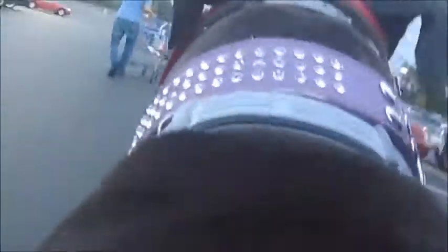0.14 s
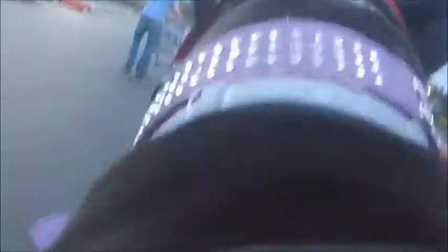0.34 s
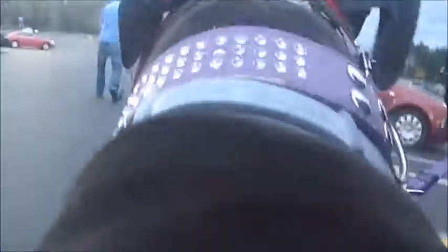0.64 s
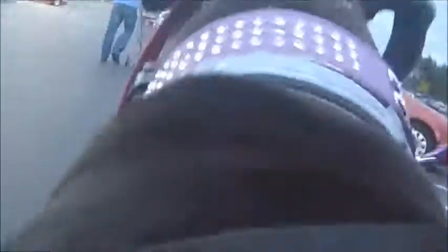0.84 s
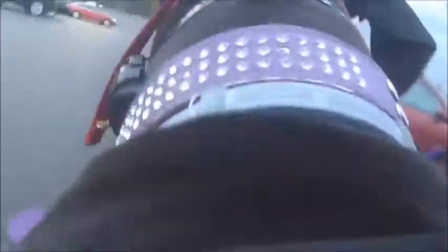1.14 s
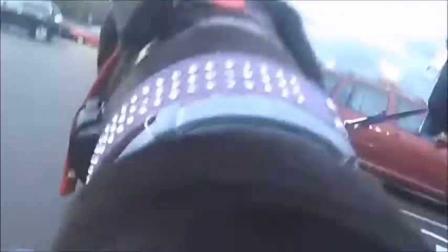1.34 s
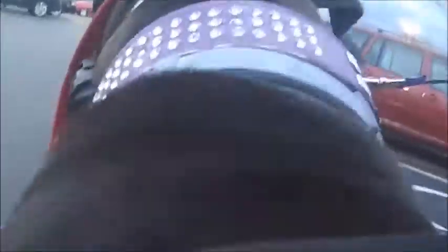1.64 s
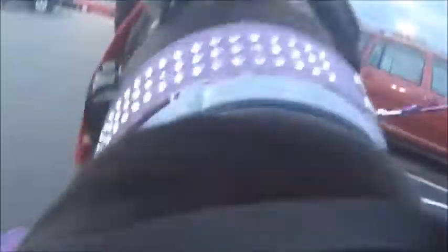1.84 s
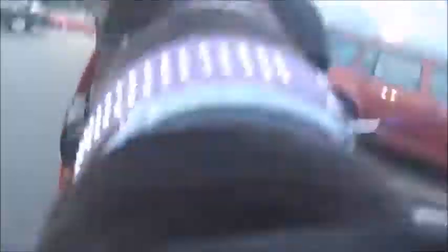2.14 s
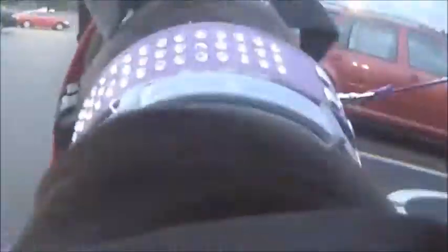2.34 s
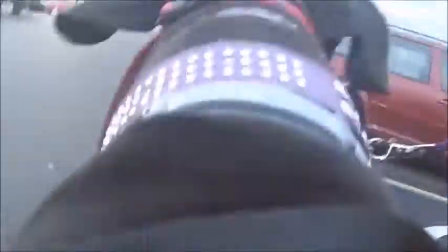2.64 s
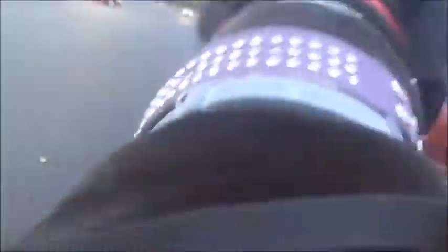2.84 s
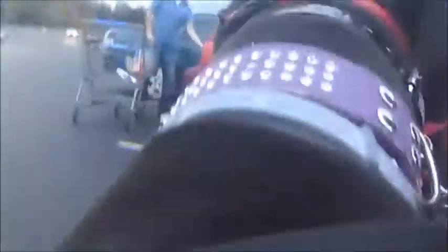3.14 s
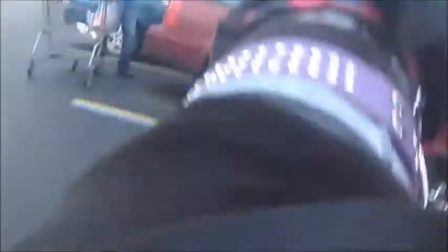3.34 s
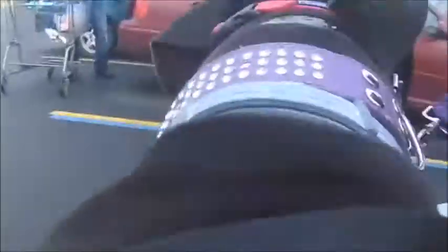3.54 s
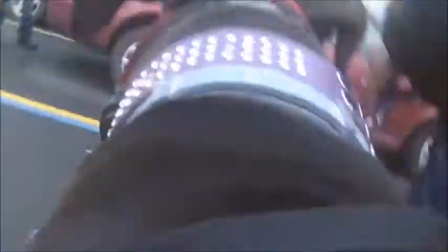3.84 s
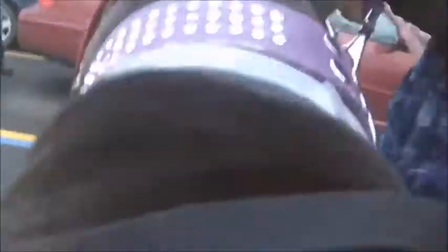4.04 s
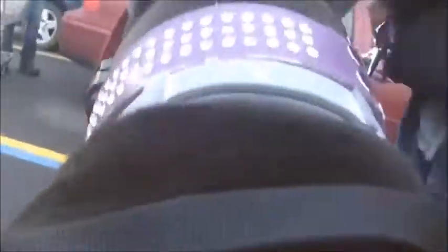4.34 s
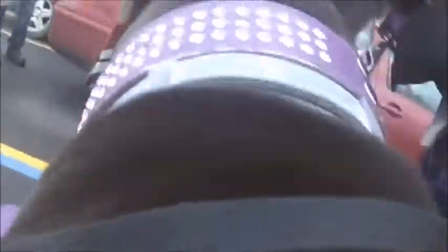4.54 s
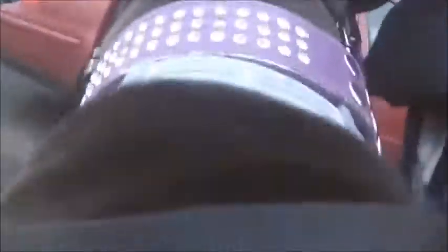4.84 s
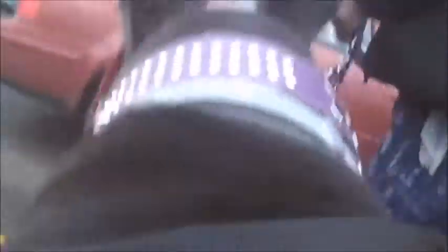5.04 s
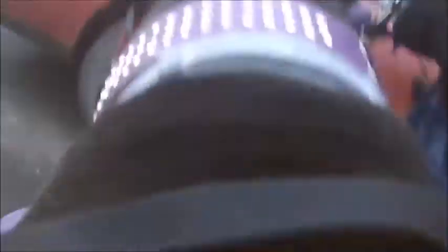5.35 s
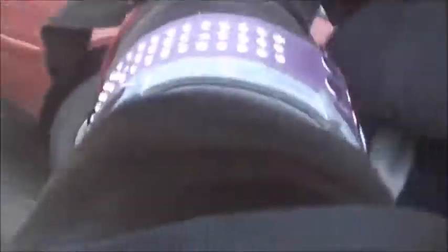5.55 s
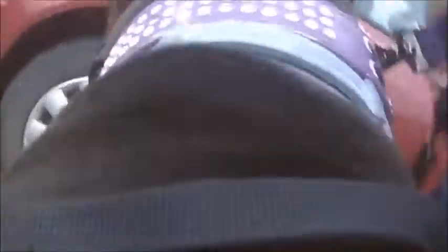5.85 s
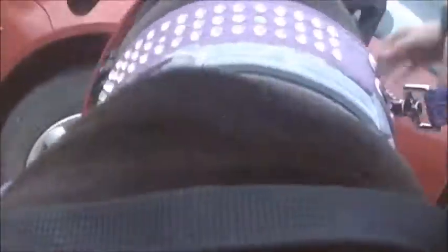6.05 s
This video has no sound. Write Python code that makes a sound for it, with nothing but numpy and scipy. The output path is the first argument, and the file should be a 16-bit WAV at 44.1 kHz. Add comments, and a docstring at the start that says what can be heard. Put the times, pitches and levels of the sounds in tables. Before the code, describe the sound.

Fur and harness rub scratchily against a microphone on a walking dog, with small ticks, two hard plastic knocks and faint outdoor hiss.

```python
"""A parking lot, heard from a small camera riding on the back of a walking dog.
Fur and harness rub on its plastic housing at every stride, the mount ticks and twice knocks hard,
and steps thud through the dog's body. A sharp clack near the end comes back from the parked cars.
Under it all lies a faint bed of outdoor rumble, hiss and hum."""
import sys
import numpy as np
from scipy import signal
from scipy.fft import rfft, irfft, next_fast_len
from scipy.io import wavfile
from scipy.ndimage import uniform_filter1d

SR = 44100
rng = np.random.default_rng(int(sys.argv[2]) if len(sys.argv) > 2 else 0)


def pcm_store(signal):
    """Save signal as 16-bit PCM."""
    levels = np.round(np.clip(np.atleast_2d(signal), -1, 1) * 32767)
    wavfile.write(sys.argv[1], SR, levels.astype(np.int16).T)


N = 273772
FIRM_DB = -42   # rub level of a firm stroke

# strokes of the strap over the housing as the shoulders roll: (start [s], length [s], level [dB])
STRAP_STROKES = [(.08, 0.25, -47), (.32, 0.061, -44), (.385, 0.11, -41), (.505, .085, -42),
                 (.63, 0.055, -44), (.71, 0.032, -43.5), (.765, 0.062, -41.5), (.86, .09, -47),
                 (.965, 0.052, -44.5), (1.05, 0.11, -46), (1.17, 0.05, -46), (1.27, 0.069, -44.5),
                 (1.37, 0.089, -50.5), (1.48, 0.056, -50.5), (1.69, 0.084, -49), (1.79, .065, -46.5),
                 (1.885, 0.089, -47.5), (2.028, 0.065, -41), (2.11, 0.1, -41.5), (2.21, 0.1, -44),
                 (2.325, 0.057, -44), (2.415, 0.036, -48), (2.55, 0.063, -46), (2.63, 0.07, -44),
                 (2.76, 0.059, -49), (2.855, 0.044, -47.5), (2.93, 0.079, -44), (3.02, 0.11, -46),
                 (3.135, 0.058, -44.5), (3.205, .07, -41.5), (3.275, 0.11, -43.5), (3.44, 0.045, -41),
                 (3.68, 0.098, -47.5), (3.84, 0.082, -44), (3.945, 0.039, -49), (4.08, 0.075, -47),
                 (4.23, 0.033, -51), (4.41, .07, -42), (4.505, 0.031, -40.5), (4.58, 0.082, -43),
                 (4.71, 0.034, -47), (4.87, 0.079, -42), (4.95, 0.14, -46.5), (5.11, 0.053, -43),
                 (5.205, 0.057, -48), (5.27, 0.13, -42.5), (5.4, .085, -45), (5.55, 0.077, -45.5),
                 (5.66, 0.044, -48.5), (5.815, .095, -44.5), (6.18, 0.067, -44.5)]

def strap_friction(rest_db=-53, wander_db=2.5, settle_s=5.93, settle_db=-7):
    """Envelope of the rub: strokes over a light, restless contact that settles after the last clack."""
    settled = np.arange(N) / SR > settle_s
    contact_db = rest_db + wander_db * drift(21) + settle_db * settled
    return np.hypot(swells(STRAP_STROKES), from_db(contact_db))


def strap_rub(rub, grains_per_s=1400, spread_db=2.5, split_hz=2500, bite_db=-13, bite_growth=1.13):
    """Hairs and webbing catch and let go in grains that ring the housing; a firmer rub is brighter."""
    sizes = from_db(spread_db * np.minimum(rng.exponential(1, N), 4)) * rng.choice([-1, 1], N)
    grains = sizes * (rng.random(N) < grains_per_s / SR)
    clumping = from_db(drift(70))
    shell = housing(grains * clumping)
    # over a few hundredths of a second the friction stays even
    shell /= np.sqrt(uniform_filter1d(shell ** 2, int(0.052 * SR)) + 1e-9)
    body = rub * rms_one(cut(shell, split_hz, "low", order=6))
    bite = from_db(FIRM_DB + bite_db) * (rub / from_db(FIRM_DB)) ** bite_growth
    return body + bite * rms_one(cut(shell, split_hz, "high", order=6))


# modes of the plastic shell: (pitch [Hz], t60 [s], gain when rubbed [dB], gain when knocked [dB])
HOUSING_MODES = [(240, 0.02, -29, -15.5), (567, 0.016, -26, -10), (1221, 0.02, -2, -5.5),
                 (1428, 0.016, 1, -6.5), (1532, 0.017, 1.5, -1), (1688, 0.02, -2.5, -3),
                 (1866, 0.023, -7.5, -7.5), (2026, 0.024, -11.5, -2.5), (2264, 0.034, -16, -10),
                 (2446, 0.022, -35, -12), (2812, 0.027, -15, -14.5), (3228, 0.016, -16, -1),
                 (3600, 0.01, -24, -7.5), (4000, 0.023, -16, -8), (4584, 0.015, -21.5, -8),
                 (4920, 0.022, -28, -15.5), (5180, 0.0061, -18, -10.5), (6480, 0.0084, -19.5, -15.5),
                 (7240, 0.011, -24.5, -22), (7630, 0.0095, -23.5, -20), (10400, 0.0006, -12.5, -8.5)]

def housing(force, knocked=False):
    """The housing rings under a rub or a blow; neighbouring modes swing in opposite senses."""
    return sum((-1) ** k * from_db(knock_db if knocked else rub_db) * ring(force, hz, t60)
               for k, (hz, t60, rub_db, knock_db) in enumerate(HOUSING_MODES))


# accents where the strap slips: (time [s], peak level [dB], low-pass cutoff [Hz])
STRAP_SLIPS = [(0.0688, -30.5, 900), (0.2753, -27, 6500), (0.4184, -27.5, 5500), (.473, -30, 7000),
               (0.778, -39, 3500), (1.1295, -27.5, 2000), (1.308, -31, 3000), (1.6168, -36.5, 2500),
               (2.072, -27, 5000), (2.1578, -25.5, 4500), (2.821, -34.5, 1990), (3.054, -37, 2500),
               (3.0843, -28, 1490), (3.216, -31.5, 3500), (3.243, -27.5, 2000), (3.473, -27.5, 3500),
               (3.578, -34.5, 3530), (3.624, -31.5, 5000), (3.7286, -32, 2200), (4.411, -32, 2520),
               (4.521, -33.5, 4500), (5.163, -26, 3000), (5.329, -30.5, 3000), (5.5723, -26, 4000),
               (5.839, -35, 4000), (5.862, -29.5, 3500)]

def strap_slips(rub, catches_per_s=16, catch_db=7, catch_cutoff_hz=4000, crumble_s=0.0012):
    """Each slip is a snap with a short crumble; random catches come more often in a firmer rub."""
    out, t = np.zeros(N), np.arange(SR // 20) / SR
    caught = np.flatnonzero(rng.random(N) < catches_per_s / SR * rub / from_db(FIRM_DB))
    catches = [(i / SR, 20 * np.log10(rub[i]) + catch_db, catch_cutoff_hz) for i in caught]
    for s, peak_db, cutoff_hz in STRAP_SLIPS + catches:
        crumble = 0.052 * rng.standard_normal(len(t)) * np.exp(-t / crumble_s)
        tick = housing(cut((t == 0) + crumble, cutoff_hz, "low", order=1))
        add(out, s, from_db(peak_db) * tick / np.abs(tick).max())
    return out


# low ring-out of the harness: (pitch [Hz], t60 [s], level after a full-scale knock [dB])
HARNESS_TWANG = [(280, 1, -48.5), (534, 0.44, -50.5), (826, 0.34, -48.5)]
# hard plastic hits at the mount, coloured by the point of contact:
# (time [s], peak level [dB], colour centre [Hz], boost or cut [dB], Q, last rebound delay [s])
MOUNT_HITS = [(0.0248, -4.5, 1420, 8.5, 3.5, 0.00106), (.669, -30, 4200, -9, 0.47, .0024),
              (2.666, -36, 5500, 17, 0.69, 0.0021), (4.497, -35, 3900, 8, 1.0, 0.0017),
              (4.9249, -20, 1280, 24, 4.1, 0.00107), (5.8783, -18.5, 900, 13, 2, 0.0029),
              (5.9049, -2, 5400, -4.5, 1.8, .00284)]

def mount_knocks(first_rebound_s=0.000812):
    """The mount hits the housing, rebounds twice within milliseconds and leaves the harness twanging."""
    out, t = np.zeros(N), np.arange(SR // 2) / SR
    twang = sum(from_db(db) * ring(t == 0, hz, t60) for hz, t60, db in HARNESS_TWANG)
    for s, peak_db, hz, boost_db, q, last_rebound_s in MOUNT_HITS:
        contacts = [(0, 1), (first_rebound_s, 0.3), (last_rebound_s, 0.21)]
        force = sum(size * np.maximum(1 - np.abs(t - at) * SR, 0) for at, size in contacts)
        band = signal.lfilter(*signal.iirpeak(hz, max(q, .5), fs=SR), force)
        clack = housing(force + (from_db(boost_db) - 1) * band, knocked=True)
        peak = from_db(peak_db)
        # only a hard blow pulls the harness taut enough to twang
        add(out, s, peak * clack / np.abs(clack).max() + peak ** 2 * twang)
    return out


# soft thuds through the dog's body: (time [s], peak level before the lift [dB], pitch [Hz])
STEP_THUDS = [(0.261, -39.5, 243), (0.715, -43, 33), (0.958, -43, 197), (1.169, -39.5, 157),
              (1.616, -43.5, 170), (1.722, -42.5, 199), (2.270, -47, 45), (2.504, -41, 232),
              (3.211, -42.5, 35), (3.595, -42, 30.2), (3.655, -40, 158), (3.893, -38, 35.8),
              (4.018, -38, 220), (4.184, -37, 208), (4.739, -46, 35)]

def step_thuds(width_cycles=0.52, lift_db=1.5):
    """Each soft push rocks the camera for about one and a half swings."""
    out, t = np.zeros(N), np.arange(-SR // 10, SR // 10) / SR
    for s, peak_db, hz in STEP_THUDS:
        swing = np.cos(2 * np.pi * hz * t) * np.exp(-(hz * t / width_cycles) ** 2)
        add(out, s + t[0], from_db(peak_db + lift_db) * swing)
    return out


# sweeps of the coat across the housing: (start [s], length [s], level [dB])
FUR_SWEEPS = [(.06, 0.28, -56), (1.88, 0.1, -53), (2.49, 0.14, -53), (3.27, 0.22, -56.5)]
# muffled tone of brushing fur: (frequency [Hz], relative level [dB])
FUR_COLOUR = [(100, -15.5), (250, -7.5), (450, -5.5), (750, -5.5), (1000, -8), (1400, -21), (4000, -53)]

def fur_brush(rub, follow_db=-16):
    """Fur brushes dully along with the strap, and in a few sweeps of its own."""
    return np.hypot(from_db(follow_db) * rub, swells(FUR_SWEEPS)) * noise(FUR_COLOUR)


# thin, bright tone of the echo off the cars: (frequency [Hz], relative level [dB])
CAR_ECHO_COLOUR = [(300, -35), (2900, -32), (3500, -15.5), (4000, -5), (4400, -11), (4900, -25),
                   (5300, -11), (5900, -26), (9000, -30), (15000, -49)]

def car_echo(level_db=-49.5, delay_s=.028, attack_s=.007, hold_s=.035, drop_t60=.14, tail_t60=0.61):
    """Parked cars scatter the last clack: a plateau of noise that drops quickly into a faint tail."""
    age = np.arange(N) / SR - MOUNT_HITS[-1][0] - delay_s
    attack = np.clip(age / attack_s, 0, 1)
    fading = np.maximum(age - hold_s, 0)
    drop, tail = from_db(-60 * fading / drop_t60), from_db(-60 * fading / tail_t60)
    tail_gain = from_db(-11)
    release = (drop + tail_gain * tail) / (1 + tail_gain)
    return from_db(level_db) * attack * release * noise(CAR_ECHO_COLOUR)


# bed of outdoor rumble and microphone hiss: (frequency [Hz], relative level [dB])
AIR_COLOUR = [(20, 3.5), (40, 2), (90, 0), (250, -4), (450, -9.5), (850, -13), (1400, -16), (2000, -20),
              (2700, -17.5), (5000, -24), (8000, -26), (12000, -26.5), (16000, -28.5)]

def outdoor_bed(air_db=-53.5, hum_hz=58.3, hum_db=-63.5):
    """Rumble and hiss waver gently over a faint, steady hum."""
    hum = np.sqrt(2) * from_db(hum_db) * np.sin(2 * np.pi * hum_hz * np.arange(N) / SR)
    return from_db(air_db + drift(4.5)) * noise(AIR_COLOUR) + hum


def swells(strokes, crest_share=0.6, fullness=0.72):
    """Gain envelope of strokes: each swells to a crest and lets go; overlaps add in power."""
    t, power = np.arange(N) / SR, np.zeros(N)
    for start, length, db in strokes:
        inside = (t > start) & (t < start + length)
        phase = np.interp((t[inside] - start) / length, [0, crest_share, 1], [0, np.pi / 2, np.pi])
        power[inside] += (from_db(db) * np.abs(np.sin(phase)) ** fullness) ** 2
    return np.sqrt(power)


def ring(force, hz, t60):
    """One resonance: a unit click sets off a decaying sine of height one."""
    r, w = from_db(-60 / (t60 * SR)), 2 * np.pi * hz / SR
    return signal.lfilter([0, np.sin(w)], [1, -2 * r * np.cos(w), r * r], force + 1e-18)


def noise(colour):
    """Noise of rms one, shaped by rows of (frequency [Hz], relative level [dB])."""
    hz, db = np.transpose(colour)
    size = next_fast_len(N)
    bins = np.maximum(np.fft.rfftfreq(size, 1 / SR), 1)
    gain = from_db(np.interp(np.log(bins), np.log(hz), db))
    return rms_one(irfft(rfft(rng.standard_normal(size)) * gain, size)[:N])


def drift(hz, hop=40, warmup=2000):
    """Smooth random wander of rms one, mostly slower than hz."""
    r = np.exp(-2 * np.pi * hz * hop / SR)
    white = rng.standard_normal(N // hop + warmup + 2)
    slow = signal.lfilter([1], [1, -2 * r, r * r], white)[warmup:]
    return np.interp(np.arange(N) / hop, np.arange(len(slow)), rms_one(slow))


def cut(x, hz, kind, order):
    """Butterworth low- or high-pass."""
    return signal.sosfilt(signal.butter(order, hz, kind, fs=SR, output="sos"), x)


def add(out, s, sound):
    """Mix a short sound in at s seconds."""
    start = max(round(s * SR), 0)
    part = sound[:max(N - start, 0)]
    out[start:start + len(part)] += part


def from_db(db):
    """Decibels to gain."""
    return 10 ** (np.asarray(db) / 20)


def rms_one(x):
    """Scale to an rms of one."""
    return x / np.sqrt(np.mean(x ** 2) + 1e-20)


def scene():
    """All layers meet at the one microphone inside the housing."""
    rub = strap_friction()
    mix = outdoor_bed() + strap_rub(rub) + fur_brush(rub)
    mix += mount_knocks() + step_thuds() + car_echo() + strap_slips(rub)
    return mix[None]


def record(dry, ceiling=.87, cutoff_hz=15900):
    """Soft overload rounds the hardest knock; a steep low-pass trims the top."""
    rounded = dry / (1 + (dry / ceiling) ** 6) ** (1 / 6)
    return signal.sosfilt(signal.ellip(10, .2, 70, cutoff_hz, fs=SR, output="sos"), rounded)


dry = scene()
out = record(dry)
pcm_store(out)
```